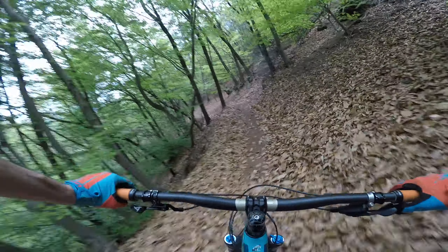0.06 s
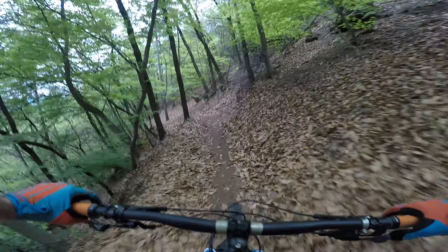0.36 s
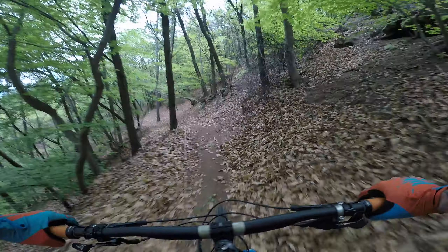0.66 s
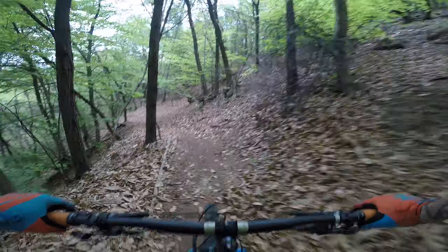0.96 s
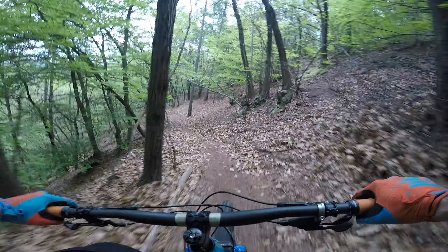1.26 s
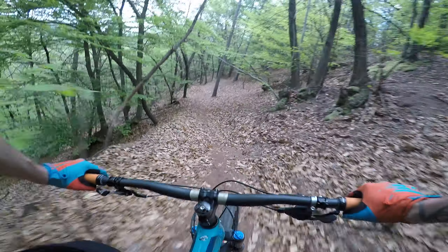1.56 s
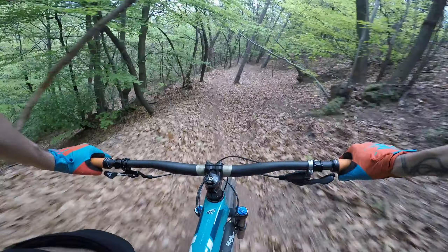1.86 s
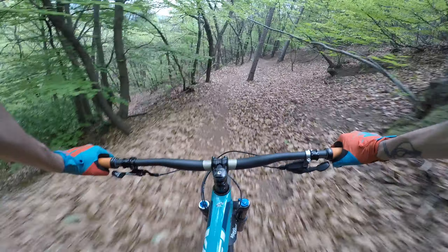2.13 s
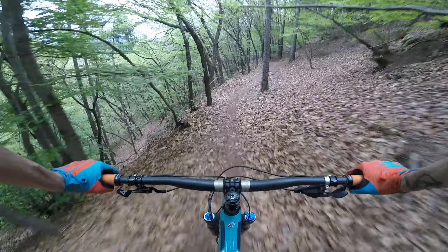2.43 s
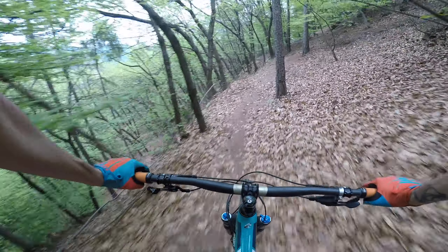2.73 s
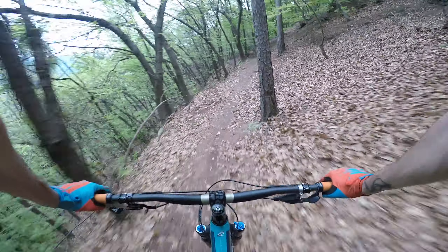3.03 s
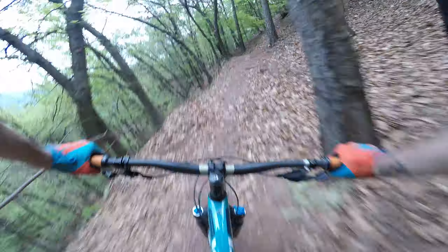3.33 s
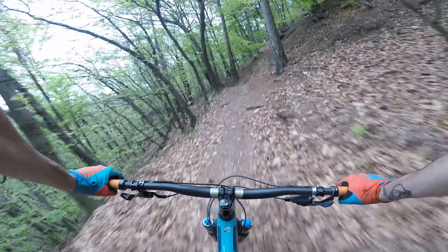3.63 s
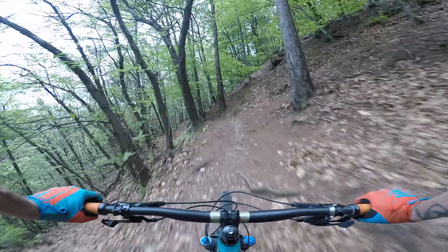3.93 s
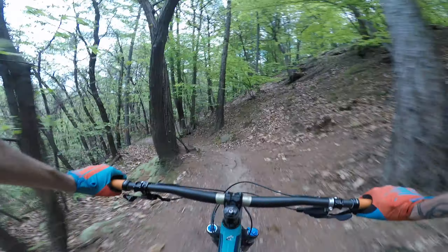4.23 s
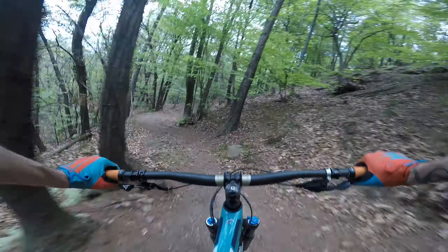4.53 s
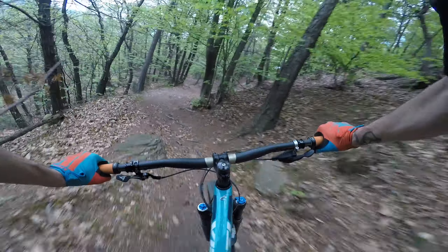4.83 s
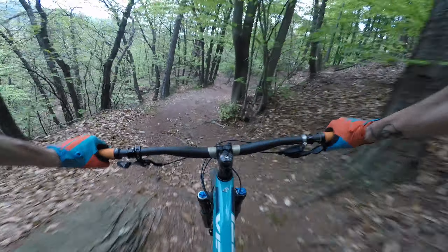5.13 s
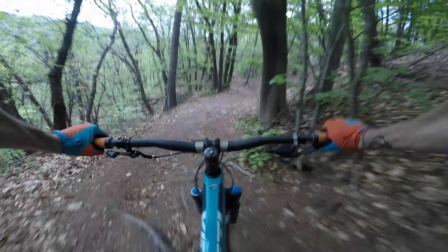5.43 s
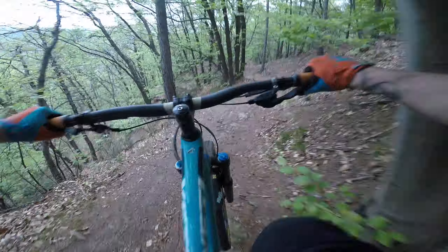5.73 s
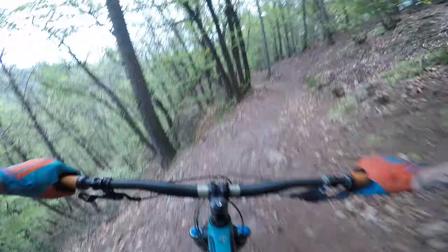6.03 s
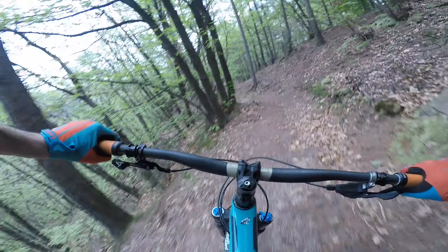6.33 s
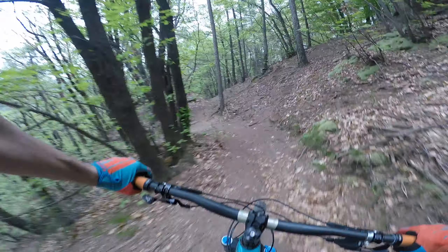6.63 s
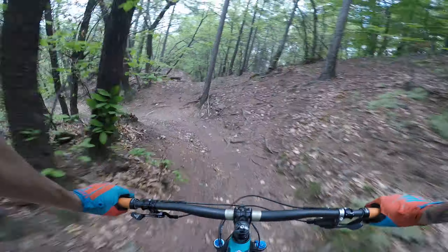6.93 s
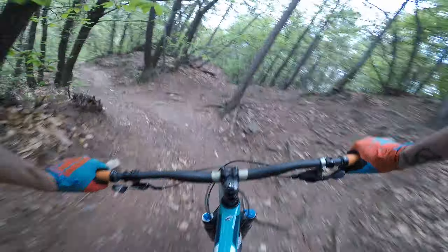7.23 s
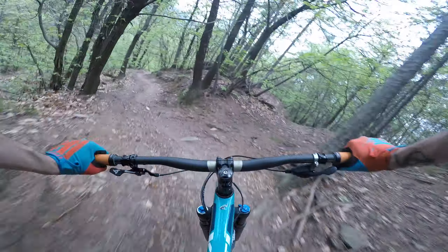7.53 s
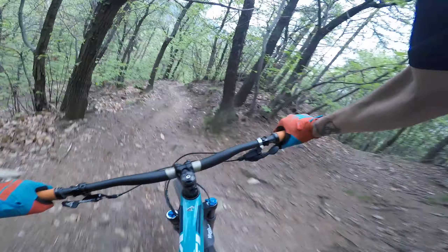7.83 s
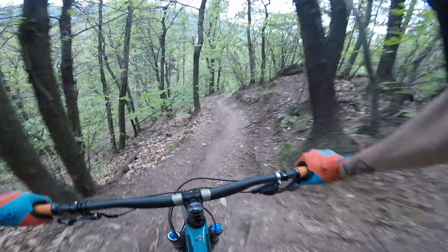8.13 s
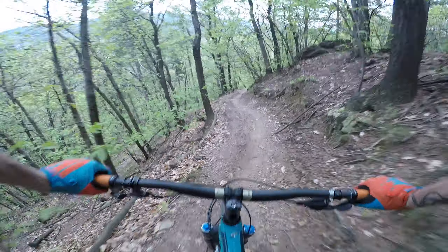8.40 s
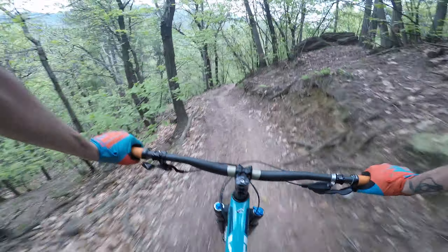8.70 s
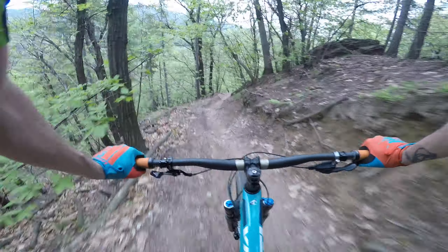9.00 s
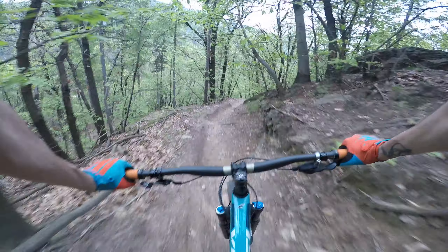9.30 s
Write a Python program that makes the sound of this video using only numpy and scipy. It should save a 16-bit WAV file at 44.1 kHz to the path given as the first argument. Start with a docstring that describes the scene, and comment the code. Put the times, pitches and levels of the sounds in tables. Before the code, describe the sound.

A mountain bike rides a forest trail, heard from the rider's chest. Wind rumbles on the microphone and the mount shakes while knobby tyres crunch over dry leaves and dirt. After about a second the freehub starts buzzing as the bike coasts, and stones tick off the frame. The leaves then thin to gritty dirt, and roots set off repeated bursts of hollow knocks and chain rattle.

```python
"""A mountain bike on a forest trail, heard from a camera on the rider's chest. From the start, headwind
rumbles on the two microphone ports, the harness shakes and knobby tyres crunch over dirt and dry leaves.
Just after a second the pedals stop and the freehub's pawls buzz from behind the legs; stones tick off
the bike. Past three seconds the leaves thin out and roots set frame and chain clattering, then again
around five to six seconds, just after seven and near the end."""
import sys
import numpy as np
from scipy import signal
from scipy.fft import rfft, irfft, next_fast_len
from scipy.io import wavfile

SR = 44100
rng = np.random.default_rng(int(sys.argv[2]) if len(sys.argv) > 2 else 0)


def wav_out(sig):
    """Save sig, one row per channel (or a flat mono array), as 16-bit PCM at SR to the path in sys.argv[1]."""
    wavfile.write(sys.argv[1], SR, np.round(np.clip(np.atleast_2d(sig).T, -1, 1) * 32767).astype(np.int16))


N = 417186
TIME = np.arange(N) / SR


def from_db(db):
    """Decibels to gain."""
    return 10 ** (np.asarray(db) / 20)


def to_db(power):
    """Power to decibels."""
    return 10 * np.log10(power)


def rms_one(x):
    """Scale to rms 1."""
    return x / np.sqrt(np.mean(x ** 2) + 1e-20)


def in_time(rows):
    """One curve per column after the time, joined by straight lines."""
    times, *columns = np.transpose(rows)
    return [np.interp(TIME, times, column) for column in columns]


def at_hz(points, hz):
    """Read a table on a log-frequency axis."""
    table_hz, values = np.transpose(points)
    return np.interp(np.log(hz), np.log(table_hz), values)


def drift(rate_hz):
    """Smooth random wander with spread 1."""
    step, settle = 40, 2000
    pole = np.exp(-2 * np.pi * rate_hz * step / SR)
    noise = rng.standard_normal(N // step + settle + 2)
    slow = signal.lfilter([1], [1, -2 * pole, pole * pole], noise)[settle:]
    return np.interp(np.arange(N) / step, np.arange(len(slow)), rms_one(slow))


def white():
    """Two unrelated noises: mid and side of the microphone pair."""
    return rng.standard_normal((2, N))


def band(x, low_hz, high_hz):
    """Band-pass."""
    return signal.sosfilt(signal.butter(2, [low_hz, high_hz], "band", fs=SR, output="sos"), x)


def colour(x, spectrum):
    """Minimum-phase filter with the shape of a spectrum; white noise keeps its level."""
    size = 4096
    hz = np.maximum(np.arange(size // 2 + 1) * SR / size, 1)
    cepstrum = irfft(np.log(from_db(at_hz(spectrum, hz))))[:size // 2]
    cepstrum[1:] *= 2
    response = irfft(np.exp(rfft(cepstrum, size)))
    return signal.oaconvolve(x, response[None] / np.linalg.norm(response), axes=1)[:, :N]


def resonate(x, modes):
    """Parallel resonances; white noise keeps its level."""
    out, power = 0, 0
    for k, (hz, width_hz, db) in enumerate(modes):
        radius = np.exp(-np.pi * width_hz / SR)
        poles = [1, -2 * radius * np.cos(2 * np.pi * hz / SR), radius ** 2]
        scale = (1 - radius ** 2) / 2
        out = out + (-1) ** k * from_db(db) * scale * signal.lfilter([1, 0, -1], poles, x)
        power += from_db(db) ** 2 * scale
    return out / np.sqrt(power)


def blows(times, levels_db):
    """Impulses of energy at the given moments."""
    energy = np.zeros(N)
    energy[np.clip(np.round(times * SR).astype(int), 0, N - 1)] = from_db(levels_db) ** 2
    return energy


def fade(energy, t60):
    """Each impulse of energy dies away by 60 dB in t60 seconds."""
    return signal.lfilter([1], [1, -from_db(-120 / (t60 * SR))], energy + 1e-18)


def decay(energy, t60):
    """Amplitude envelope of fading impulses of energy."""
    return np.sqrt(fade(energy, t60))


def grains(per_s, spread_db, t60):
    """Envelope of many tiny random impacts of uneven size, at rms 1."""
    sizes = from_db(spread_db * np.minimum(rng.exponential(1, N), 3.2))
    hits = rng.random(N) < per_s / SR
    return rms_one(decay(hits * sizes ** 2, t60))


def swells(rows, attack_s, release_s):
    """Summed power of events that rise, hold for their length and die away."""
    power = 0
    for start, length, db in rows:
        before = np.maximum(start - TIME, 0) / attack_s
        after = np.maximum(TIME - start - length, 0) / release_s
        power = power + (from_db(db) * np.exp(-before - after)) ** 2
    return power


def bell_curve(centre_s, half_width_s):
    """A smooth rise to 1 and back."""
    return np.exp(-((TIME - centre_s) / half_width_s) ** 2)


def struck(times, levels_db, pitches_hz, modes):
    """Each blow rings a set of modes on its own pitch; mid and side are out of step."""
    out = np.zeros((2, N + SR))
    t = np.arange(SR // 4) / SR
    for time, db, hz in zip(times, levels_db, pitches_hz):
        ring = sum(from_db(db + mode_db - 60 * t / t60) * np.exp(2j * np.pi * hz * ratio * t)
                   for ratio, mode_db, t60 in modes)
        start = int(time * SR)
        out[:, start:start + len(t)] += [ring.imag, ring.real * (1 - np.exp(-t * hz))]
    return out[:, :N]


def hiss():
    """A faint, steady, high hiss behind everything."""
    return from_db(-51) * band(white(), 4400, 9400)


# Brief lulls at the microphone: (time [s], half width [s], wind change [dB], shake change [dB])
LULLS = [(1.14, 0.023, -7, 2), (1.42, 0.05, -4.5, 0), (3.189, 0.027, -9, -6), (3.505, 0.029, -12, -14),
         (6.05, 0.018, -8, -1), (6.42, 0.02, 0, -14), (6.68, 0.1, -5.5, -5), (7.33, 0.02, -5, -5),
         (7.79, 0.055, -0.5, -6), (8.12, 0.075, -6, -7)]

def lulls():
    """The rumble drops away for a moment: a dB curve for the wind and one for the shake."""
    return sum(np.outer(changes_db, bell_curve(time, width)) for time, width, *changes_db in LULLS)


# Headwind right on the microphone ports: (time [s], large eddies [dB], small eddies [dB])
HEADWIND = [(0.0, -35, -38.5), (0.9, -27, -32.5), (1.2, -30, -36.5), (2.5, -23.5, -24.5), (3.0, -26, -30),
            (3.44, -26, -26.5), (3.54, -32.5, -36), (4.48, -32.5, -36), (4.64, -23, -34), (5.4, -41, -29.5),
            (5.72, -32, -38), (5.95, -32, -33), (6.4, -40, -39), (6.7, -30.5, -37), (7.3, -30.5, -28),
            (7.7, -41, -41.5), (8.05, -28.5, -35), (8.3, -26, -28.5), (9.46, -29.5, -27.5)]
# Single gusts of large eddies: (time [s], length [s], level [dB])
GUSTS = [(0.52, 0.036, -26.5), (1.6, 0.15, -25.5), (3.26, 0.18, -30), (4.35, .05, -26.5),
         (4.95, 0.045, -26), (5.18, 0.023, -31), (7.0, 0.11, -33), (7.86, .03, -40)]
# Spectra of the two eddy sizes: (frequency [Hz], level [dB])
LARGE_EDDY_SPECTRUM = [(24, -24.5), (40, -9), (65, -9), (200, -19.5), (260, -63), (440, -120)]
SMALL_EDDY_SPECTRUM = [(88, -15.5), (160, -0.5), (280, -2), (430, -10), (626, -17), (1000, -31),
                       (2200, -63.5)]

def wind():
    """Eddies buffet each port in lumps, with gusts and lulls."""
    large_db, small_db = in_time(HEADWIND)
    large_db = to_db(from_db(large_db) ** 2 + swells(GUSTS, attack_s=.039, release_s=.039))
    lull_db, _ = lulls()
    lump_db = lull_db + drift(20)   # one eddy sheds both sizes
    large = from_db(large_db + 2 + lump_db + 1.56 * drift(11.5)) * colour(white(), LARGE_EDDY_SPECTRUM)
    small = from_db(small_db + lump_db + 1.6 * drift(49)) * colour(white(), SMALL_EDDY_SPECTRUM)
    return large + small


# Roughness of the trail, felt at the chest mount: (time [s], level [dB])
ROUGHNESS = [(0.0, -19.5), (1.3, -23.5), (3.18, -22.5), (3.35, -11), (3.7, -23), (4.5, -19.5), (5.2, -9),
             (6.05, -17), (6.7, -17.5), (7.0, -17), (7.25, -10.5), (7.65, -12.5), (8.15, -19.5), (8.7, -16),
             (9.46, -11.5)]
# Roots and dips that jolt the mount: (time [s], swing [dB])
JOLTS = [(1.84, -11.5), (3.33, -13), (3.45, -6), (3.57, -11.5), (4.05, -21), (5.5, -12), (5.89, -8),
         (6.0, -7), (6.13, -7.5), (6.22, -10.5), (6.56, -18), (7.2, -9.5), (7.42, -11), (7.64, -9.5)]

def camera_shake():
    """The camera bounces on its harness, harder on rough ground; sways and jolts throw it to and fro."""
    rough_db, = in_time(ROUGHNESS)
    _, lull_db = lulls()
    bounce_hz = 23 * from_db(2.6 * drift(22.46))
    bounce_db = rough_db - 2 + lull_db + 2.3 * drift(30.6)
    bounce = from_db(bounce_db) * np.sin(2 * np.pi * np.cumsum(bounce_hz) / SR)
    sway_period_s, sway_db, throw_hz = .367, -13, 27.7
    sways = [(sway_period_s * k, sway_db) for k in range(12)]   # a steady beat for the first four seconds
    throws = sum(from_db(db) * bell_curve(time, .025) * np.sin(2 * np.pi * throw_hz * (TIME - time))
                 for time, db in sways + list(JOLTS))
    return np.sqrt(2) * (bounce + throws)


# Bumps on the housing, right at the microphone: (time [s], level [dB])
BUMPS = [(0.967, -30.5), (2.867, -26), (4.08, -25.5), (4.65, -24.5), (4.96, -22), (5.267, -25),
         (6.081, -24.5), (6.828, -24), (7.935, -30), (8.0, -29)]

def bumps():
    """Dull pushes on the camera housing, each a short low thud."""
    push = white() * decay(blows(*np.transpose(BUMPS)), t60=.11)
    return from_db(25.5) * band(push, 55, 280)


# Leaves touching the bike, down at wheel height: (time [s], length [s], level [dB])
SWISHES = [(3.424, 0.012, -29), (5.657, 0.012, -38), (5.922, 0.021, -40), (8.985, 0.015, -34)]
# Spectrum of that touch: (frequency [Hz], level [dB])
SWISH_SPECTRUM = [(5000, -25), (6800, 2), (8600, -10.5), (15000, -30)]

def swishes():
    """Dry leaves brush along the spokes and frame in a short, thin hiss."""
    return np.sqrt(swells(SWISHES, attack_s=.0062, release_s=.0062)) * colour(white(), SWISH_SPECTRUM)


# Tyres scrubbing sideways on the trail below: (time [s], length [s], level [dB])
SCRAPES = [(0.265, 0.034, -28), (0.48, 0.032, -30), (4.65, 0.196, -34), (7.24, 0.044, -28)]
# Spectrum of dragged grit: (frequency [Hz], level [dB])
SCRAPE_SPECTRUM = [(400, -14), (900, 4), (1400, 0.5), (2000, 4), (2700, 3.5), (3900, -1.5), (4800, -16),
                   (8000, -28)]

def scrapes():
    """Sliding knobs drag loose grit over hard ground in quick slips."""
    slips = grains(per_s=500, spread_db=4, t60=.016)
    slide = np.sqrt(swells(SCRAPES, attack_s=.015, release_s=.02))
    return slide * colour(white() * slips, SCRAPE_SPECTRUM)


# Trail dirt under the tyres, heard from chest height: (frequency [Hz], level [dB])
DIRT_SPECTRUM = [(240, -13.5), (380, 4), (874, 0.5), (1080, -3), (1480, -3), (1950, -5.5), (2800, -6),
                 (5000, -20), (6500, -37), (11000, -120)]

def dirt(level_db):
    """Knobs crush grit; harder contact gives more grains."""
    grit = grains(per_s=1100 * from_db(.5 * (level_db + 34)), spread_db=4, t60=.056)
    return from_db(level_db + 2.5 + drift(13.4)) * colour(white() * grit, DIRT_SPECTRUM)


# Dry leaves on the forest floor, heard from chest height: (frequency [Hz], level [dB])
LEAF_SPECTRUM = [(1180, -13), (2000, -6), (2270, -7), (3390, -1), (3750, 2), (4880, -2.5), (5360, 3),
                 (6040, 0.5), (7660, -4.5), (8860, -16), (10200, -16.5), (11300, -25), (13200, -17),
                 (14500, -25), (15300, -41)]

def leaves(level_db):
    """Big snaps cover all bands; each small leaf cracks in a band of its own size."""
    per_s = 2400 * from_db(.5 * (level_db + 35.5))
    snaps = grains(per_s, spread_db=6.5, t60=.016)
    edges_hz = np.geomspace(1200, 16000, 8)
    rustle = 0
    for low, high in zip(edges_hz, edges_hz[1:]):
        crackle = .6 * snaps + .5 * grains(per_s / 2, spread_db=3.5, t60=.014)
        rustle = rustle + band(white() * crackle, low, high) * from_db(2 * drift(30))
    return from_db(level_db + .44) * colour(rustle, LEAF_SPECTRUM)


# How hard the tyres grind, a metre or so below the microphone: (time [s], level [dB])
GRIP = [(0.0, -35.5), (0.48, -39.5), (0.64, -39), (1.75, -42.5), (2.0, -37.5), (2.7, -37.5), (2.95, -34.5),
        (3.45, -34.5), (3.68, -41), (4.3, -42), (4.72, -35.5), (5.1, -37), (5.75, -39.5), (6.85, -40.5),
        (7.22, -32), (7.7, -42), (8.55, -37), (9.46, -35)]
# Bites into a rut or bank, and drifts of leaves on the trail: (time [s], length [s], level [dB])
BITES = [(3.27, 0.028, -30.5), (3.40, 0.032, -37.5), (3.96, 0.11, -39.5), (5.35, 0.036, -35),
         (5.5, 0.0087, -33), (5.62, 0.029, -42), (5.83, 0.019, -39), (5.94, 0.077, -37.5),
         (7.26, 0.022, -38), (7.335, 0.088, -37.5), (7.62, 0.061, -41)]
LEAF_DRIFTS = [(0.045, 0.037, -30), (0.17, 0.22, -33), (0.265, 0.02, -31), (0.44, 0.088, -31.5),
               (0.93, 0.026, -37), (1.3, 0.63, -41.5), (1.9, 0.061, -33), (2.06, 0.027, -31),
               (2.135, 0.039, -30), (2.25, 0.068, -30), (2.34, 0.16, -35.5), (2.94, .18, -29.5),
               (3.15, 0.065, -32)]
# Crests where the bike goes light: (time [s], half width [s], dip [dB])
CRESTS = [(5.76, 0.033, -6), (7.92, 0.039, -3)]

def tyres():
    """Grip and bites crush the dirt and its scattered leaves; drifts of leaves add their own rustle."""
    grip_db, = in_time(GRIP)
    crunch = from_db(grip_db) ** 2 + swells(BITES, attack_s=.011, release_s=.04)
    stray_leaves = crunch * from_db(-2) ** 2
    rustle = stray_leaves + swells(LEAF_DRIFTS, attack_s=.047, release_s=.019)
    load_db = sum(db * bell_curve(time, width) for time, width, db in CRESTS)
    return dirt(to_db(crunch) + load_db) + leaves(to_db(rustle) + load_db)


# Spectrum of a hard contact on the frame, from pebble or chain: (frequency [Hz], level [dB])
CONTACT_SPECTRUM = [(500, -23), (1100, 3), (2400, 0.5), (3800, -2.5), (5000, -8.5), (9000, -35)]

def pebbles(per_s=7):
    """Small stones tick against the frame at random, louder where the tyres grind harder."""
    grip_db, = in_time(GRIP)
    hits = rng.random(N) < per_s / SR
    energy = hits * from_db(grip_db + 9 + rng.normal(0, 1.8, N)) ** 2
    return colour(white() * decay(energy, t60=.014), CONTACT_SPECTRUM)


# The freehub, below and behind the microphone: (time [s], level [dB])
FREEHUB_LEVEL = [(1.27, -41), (1.6, -43), (2.5, -37), (3.7, -42), (4.15, -41.5), (4.5, -33), (5.05, -39),
                 (5.5, -49), (6.2, -45), (8.1, -42), (8.3, -33), (9.46, -39)]
# Wheel speed at the ratchet: (time [s], rate [teeth/s])
TOOTH_RATE = [(1.25, 83), (2.5, 103), (4.5, 61), (5.05, 103), (5.5, 58), (8.1, 57.5), (9.46, 85)]
# Path from the rear hub past the rider's legs: (time [s], openness [gain])
HUB_OPENNESS = [(1.27, 0.38), (1.72, 1.05), (2.2, 0.5), (3.3, 0.3)]
# Resonances of hub and disc, and the bright ones of the pawls: (frequency [Hz], width [Hz], level [dB])
HUB_MODES = [(2905, 220, 10), (3650, 80, 6), (3890, 180, 4), (6030, 480, -2)]
PAWL_MODES = [(2920, 120, 7.5), (3690, 45, 8.5), (8350, 350, 1.5), (12600, 1500, -11)]
# Spectrum of a pawl's click: (frequency [Hz], level [dB])
CLICK_SPECTRUM = [(1290, -40), (2200, 3), (2970, 8), (3350, 5), (3790, -14), (5960, -3), (12400, -18),
                  (15300, -39)]

def freehub(coast_from_s=1.25):
    """Two pawls drop off each ratchet tooth, one just after the other, unevenly, and ring the hub."""
    teeth_per_s, = in_time(TOOTH_RATE)
    level_db, = in_time(FREEHUB_LEVEL)
    openness, = in_time(HUB_OPENNESS)
    teeth = np.cumsum(teeth_per_s * (1 + .02 * drift(18))) / SR
    drops = sum(np.diff(np.floor(teeth - lag), prepend=0) > 0 for lag in (0, .27))
    force = from_db(rng.normal(0, 3, N) + drift(7.3))
    clicks = rms_one(decay(drops * force ** 2, t60=.032))
    ring = resonate(white() * clicks, HUB_MODES)
    tick = from_db(-1.5) * colour(white() * clicks, CLICK_SPECTRUM)
    bright = from_db(-40.5) * openness * resonate(white() * clicks, PAWL_MODES)
    coasted_s = np.maximum(TIME - coast_from_s, 0)
    onset = np.minimum(coasted_s / .01, 1)
    accent = from_db(12.5 * np.exp(-coasted_s / .076))   # hardest just as the pedals stop
    return onset * accent * (from_db(level_db - 6) * (ring + tick) + bright)


# Chain slaps and pebbles, about a metre from the microphone: (time [s], level [dB], pitch [Hz])
CLACKS = [(1.017, -22.5, 1225), (1.166, -27.5, 5300), (2.951, -17, 3800), (3.208, -16.5, 2780),
          (3.2804, -19.5, 1390), (3.346, -20, 2340), (3.5174, -19, 2490), (4.028, -21.5, 1030),
          (4.378, -21, 2900), (4.428, -25, 2200), (5.3677, -20, 2450), (5.8082, -27, 3400),
          (7.08, -18.5, 1330), (7.467, -24, 3540), (7.8444, -25, 1420), (8.062, -24, 1250),
          (8.2221, -16.5, 1710), (8.3257, -18.5, 1250), (8.791, -20, 1640), (9.0513, -18.5, 2410)]
# Ring of a clack or a flicked stone: (frequency [multiple of pitch], level [dB], t60 [s])
CLACK_MODES = [(.62, -8, 0.021), (1, 1, 0.033), (1.33, -9.5, 0.028), (1.9, -21, .015)]

def clacks(longest_rebound_s=.013):
    """A hard, dry contact cracks, rings very briefly and bounces once with a weaker crack."""
    times, db, pitch_hz = np.transpose(CLACKS)
    rebound_times = times + longest_rebound_s * rng.uniform(.5, 1, len(times))
    energy = blows(times, db) + blows(rebound_times, db - 10)
    crack = colour(white() * decay(energy, t60=.022), CONTACT_SPECTRUM)
    return from_db(-2.5) * crack + from_db(-5) * struck(times, db, pitch_hz, CLACK_MODES)


# Stones and twigs flicked up against the bike: (time [s], snap [dB], bright crack [dB], pitch [Hz])
STONE_STRIKES = [(0.518, -18, -41, 1880), (0.53, -18, -41, 5290), (1.311, -14, -20, 6920),
                 (1.4431, -27, -35, 5470), (1.9274, -11, -40, 3240), (1.9845, -16, -41, 6100),
                 (2.1891, -18, -48, 5330), (2.794, -17.5, -42, 2260), (2.819, -14, -42, 3520),
                 (2.9038, -13, -48, 4500), (3.7552, -22, -55, 4300), (5.5627, -12, -31, 3856),
                 (6.0088, -16, -39, 7180), (6.5777, -19, -35, 4470), (7.3583, -16, -33, 3780),
                 (9.428, -17, -27, 5000)]
# Spectrum of a sharp snap, from a stone or a chain link: (frequency [Hz], level [dB])
SNAP_SPECTRUM = [(880, -2), (1500, -4), (2300, 2.5), (4080, 0.5), (5840, 6), (7090, -0.5), (8610, -11),
                 (11900, -21), (15300, -73)]

def flicked_stones():
    """A sharp strike with a bright edge, then a scatter of grit; each spot rings on its own pitch."""
    times, snap_db, crack_db, pitch_hz = np.transpose(STONE_STRIKES)
    energy = blows(times, snap_db)
    strike = decay(energy, t60=.009)
    scatter = from_db(-4.5) * decay(energy, t60=.073)
    snap = colour(white() * (strike + scatter), SNAP_SPECTRUM)
    ring = struck(times, snap_db, pitch_hz, CLACK_MODES)
    crack = band(white() * decay(blows(times, crack_db), t60=.025), 5600, 13000)
    return from_db(-5.5) * snap + from_db(-8.5) * ring + from_db(.5) * crack


# Roots hit the bike, close below the microphone: (time [s], body [dB], rattle [dB], clunk [dB], pitch [Hz])
ROOT_KNOCKS = [(3.207, -17, -35, -22, 700), (3.415, -14, -29.5, -20, 504), (3.437, -13.5, -36, -11, 978),
               (4.762, -17.5, -53, -29, 970), (5.171, -19, -42, -23, 950), (5.301, -15.5, -29, -19, 512),
               (5.498, -22, -33, -34, 910), (5.651, -21, -38.5, -17, 917), (5.957, -14, -38, -14.5, 560),
               (7.148, -13.5, -38, -14, 857), (7.343, -15, -47, -17, 624), (7.381, -15, -42, -14.5, 877),
               (9.234, -12, -31.5, -23, 1410)]
# Hollow ring of the frame: (frequency [multiple of pitch], level [dB], t60 [s])
FRAME_MODES = [(.86, -10.5, 0.03), (1, 3.5, 0.033), (1.5, -4, 0.029), (1.87, -7, .045), (2.34, -9, 0.034)]
# Spectrum of the body of a knock: (frequency [Hz], level [dB])
BODY_SPECTRUM = [(180, -19.5), (300, 2.5), (415, -12.5), (946, -2.5), (1240, -11), (1810, -9.5),
                 (4000, -10.5), (5200, -23), (8800, -120)]

def root_knocks():
    """A root jolts the frame, which rings hollow at a pitch set by the spot hit; the chain rattles on."""
    times, body_db, rattle_db, clunk_db, pitch_hz = np.transpose(ROOT_KNOCKS)
    clunk = struck(times, clunk_db, pitch_hz, FRAME_MODES)
    body = colour(white() * decay(blows(times, body_db), t60=.088), BODY_SPECTRUM)
    loosening = fade(blows(times, rattle_db), t60=.045)   # the rattle builds over a few milliseconds
    loosening *= np.sum(from_db(rattle_db) ** 2) / np.sum(loosening)   # same energy, spread out
    chain = white() * decay(loosening, t60=.097) * grains(per_s=700, spread_db=-3, t60=.01)
    return from_db(-1.5) * clunk + from_db(-5.5) * body + from_db(7.5) * colour(chain, SNAP_SPECTRUM)


# Likeness of the two microphone ports: (frequency [Hz], correlation [-1 to 1])
PORT_LIKENESS = [(60, .6), (150, .3), (330, .1), (760, -.55), (1100, .1), (1900, 0), (2400, .72),
                 (4300, .92), (5000, .35), (6000, .58), (8900, -.35), (10500, .2)]
# Balance between the ports: (frequency [Hz], left minus right [dB])
PORT_BALANCE = [(60, -7.5), (99, 12.5), (160, -1.5), (270, 2.5), (440, 4.5), (730, 1), (1210, -0.5),
                (2000, 2.5), (3300, -0.5), (5440, 4.5), (8980, 0), (14800, 3.5)]

def microphone_ports(mid_side):
    """The camera body makes left and right alike in some bands and opposed in others."""
    size = next_fast_len(N + 4096)
    mid, side = rfft(mid_side, size)
    hz = np.maximum(np.arange(len(mid)) * SR / size, 1)
    alike = at_hz(PORT_LIKENESS, hz)
    sign = np.array([[1], [-1]])   # left, right
    pair = np.sqrt((1 + alike) / 2) * mid + sign * np.sqrt((1 - alike) / 2) * side
    balance = from_db(sign * at_hz(PORT_BALANCE, hz) / 2)
    return irfft(pair * balance, size)[:, :N]


def scene():
    """Bike and wind reach the chest microphone over a faint hiss; the shake moves both ports together."""
    background = hiss()
    trail = tyres() + scrapes() + swishes() + pebbles()
    bike = freehub() + root_knocks() + clacks() + flicked_stones()
    buffeting = wind() + bumps()
    return from_db(2.5) * microphone_ports(background + buffeting + trail + bike) + camera_shake()


def record(dry):
    """The tallest peaks are rounded and the highest treble is cut."""
    ceiling, knee, cutoff_hz = .95, 6, 15200
    rounded = dry / (1 + np.abs(dry / ceiling) ** knee) ** (1 / knee)
    return signal.sosfilt(signal.ellip(10, .1, 80, cutoff_hz, fs=SR, output="sos"), rounded)


dry = scene()
out = record(dry)
wav_out(out)
```